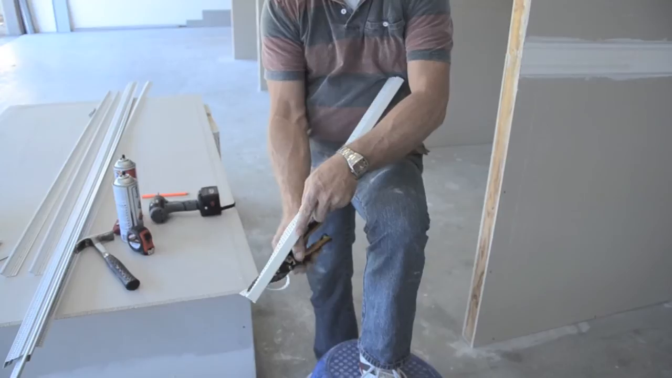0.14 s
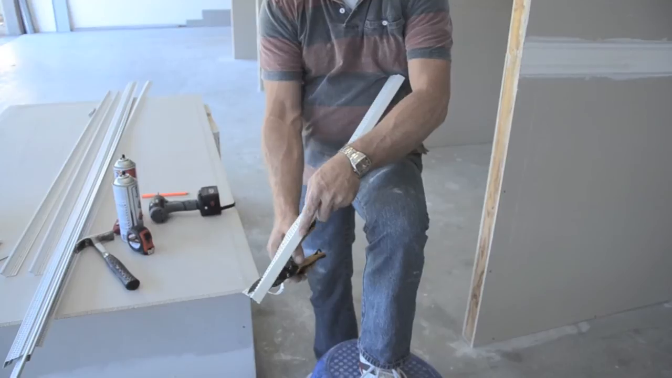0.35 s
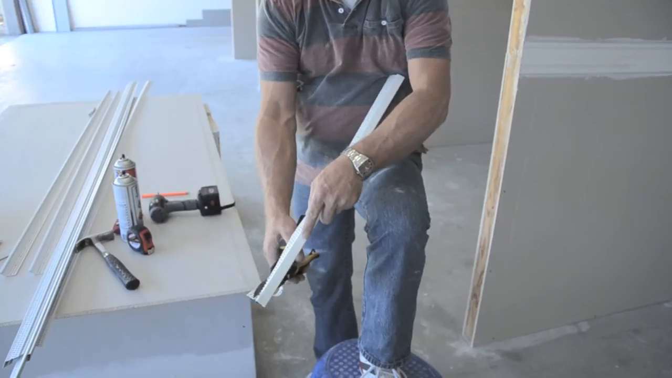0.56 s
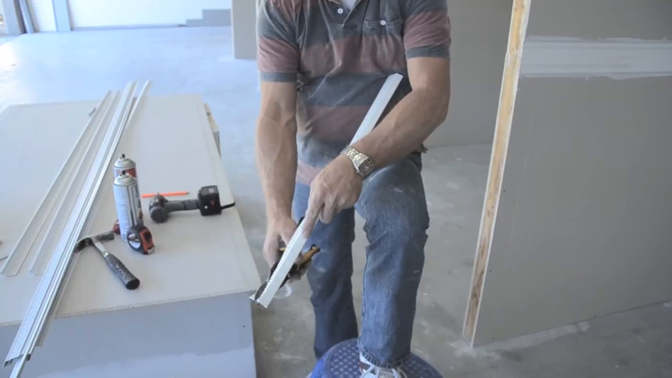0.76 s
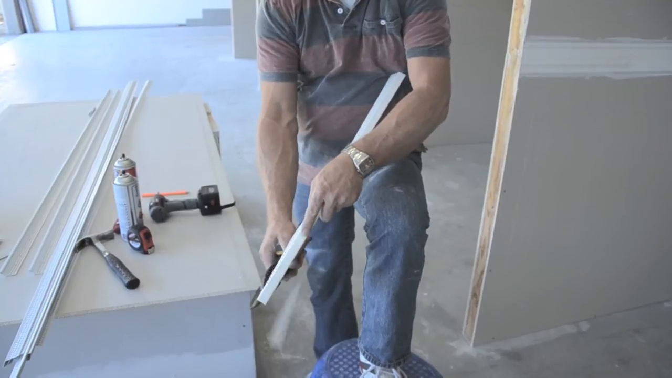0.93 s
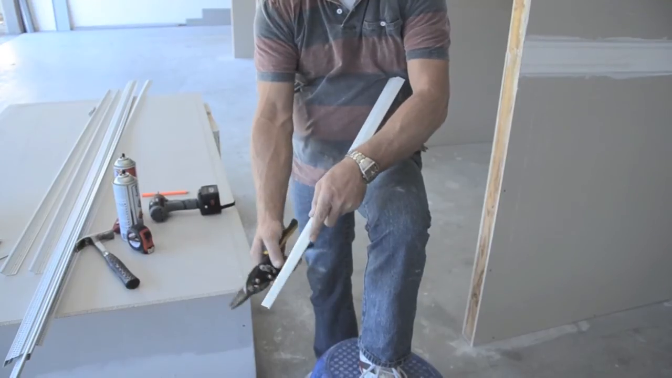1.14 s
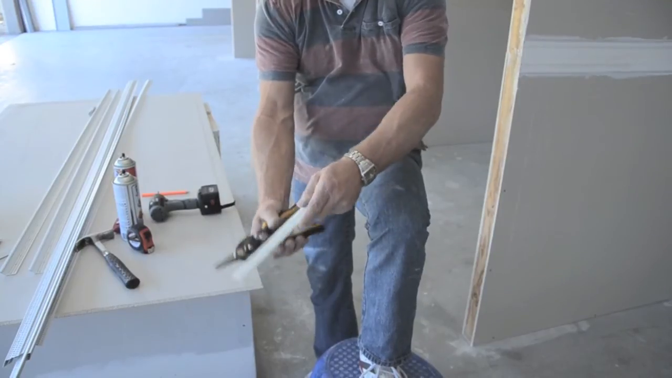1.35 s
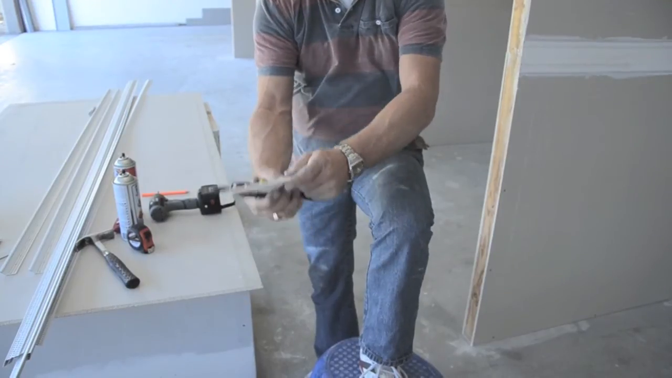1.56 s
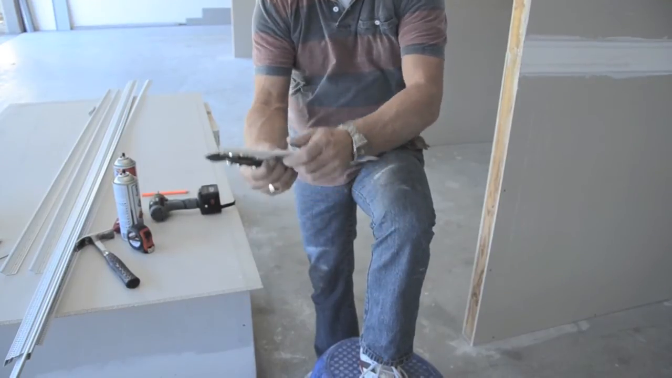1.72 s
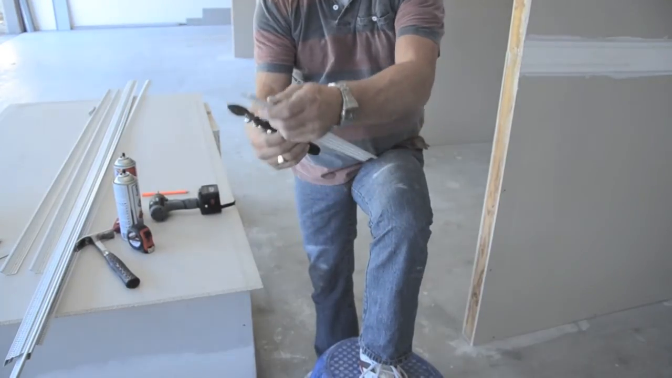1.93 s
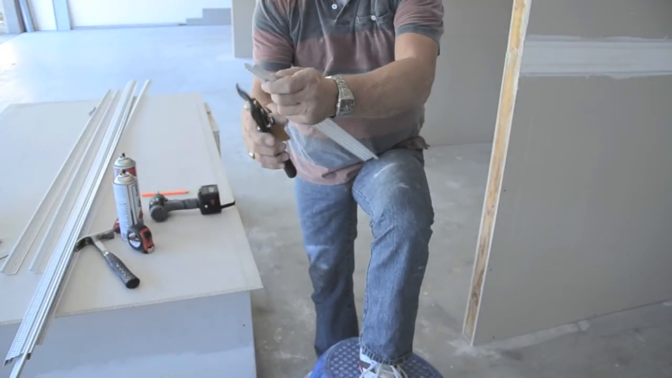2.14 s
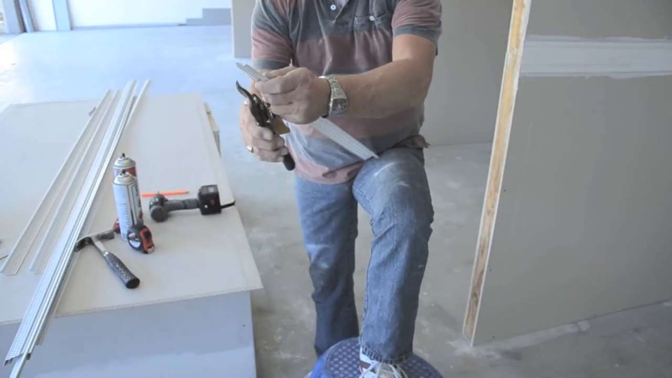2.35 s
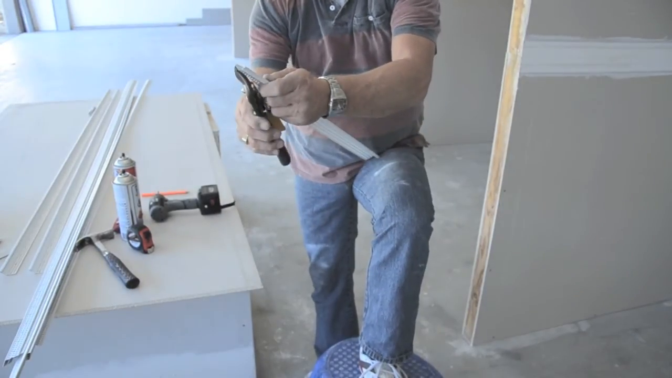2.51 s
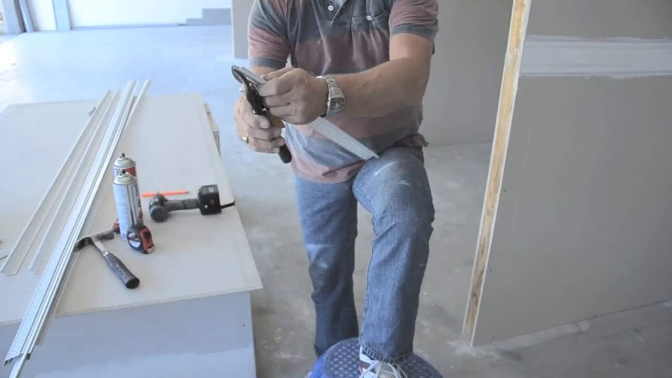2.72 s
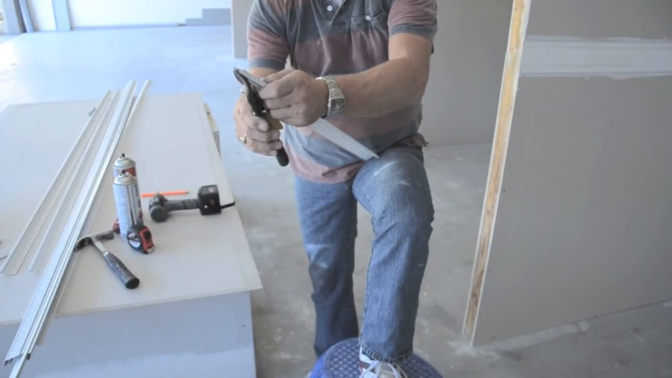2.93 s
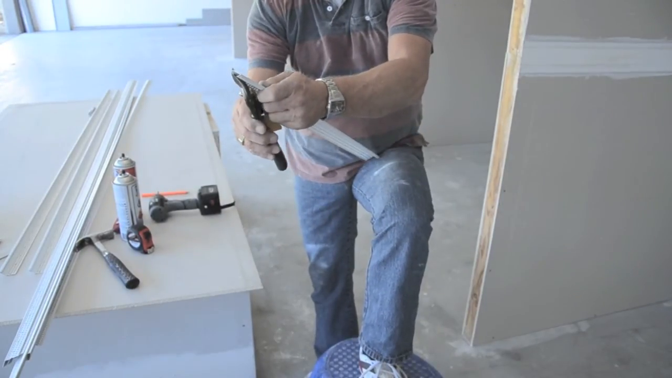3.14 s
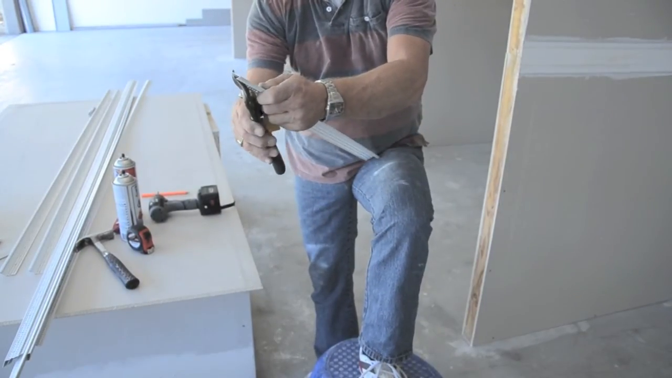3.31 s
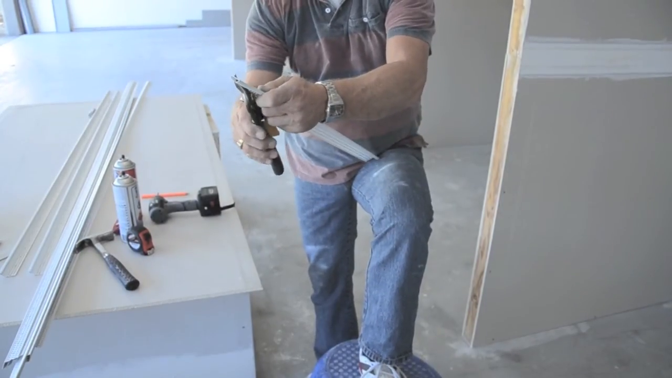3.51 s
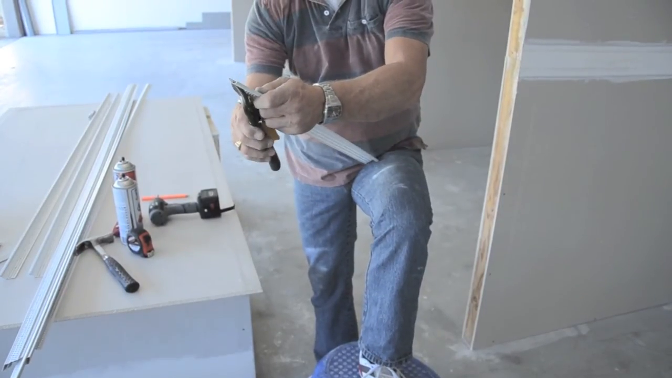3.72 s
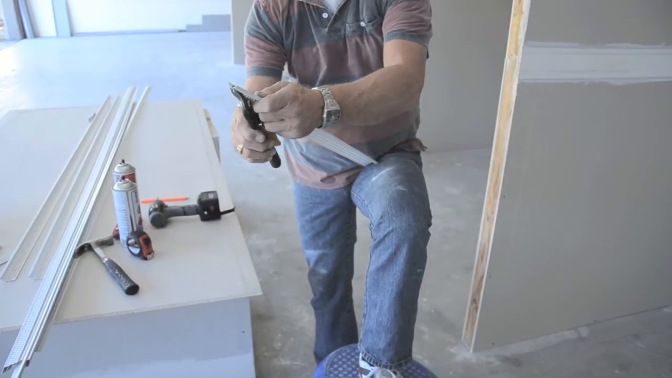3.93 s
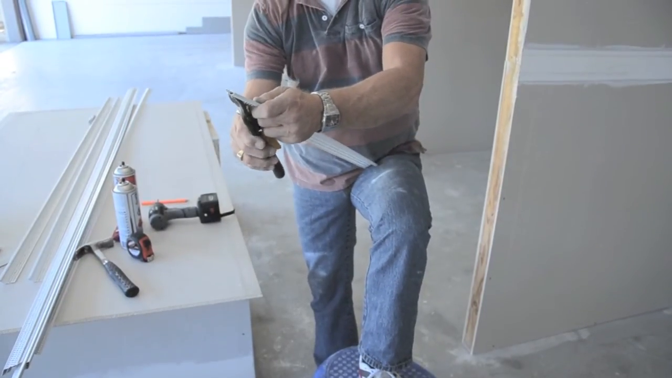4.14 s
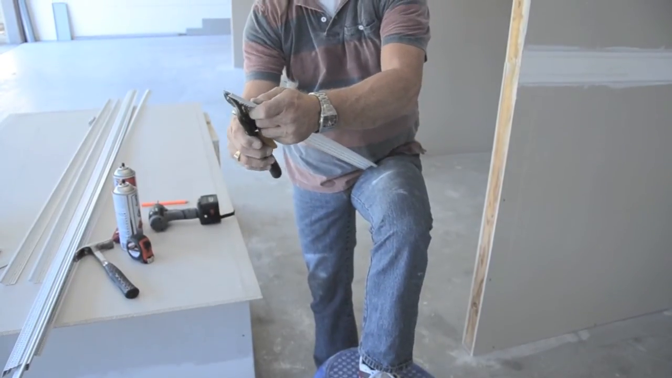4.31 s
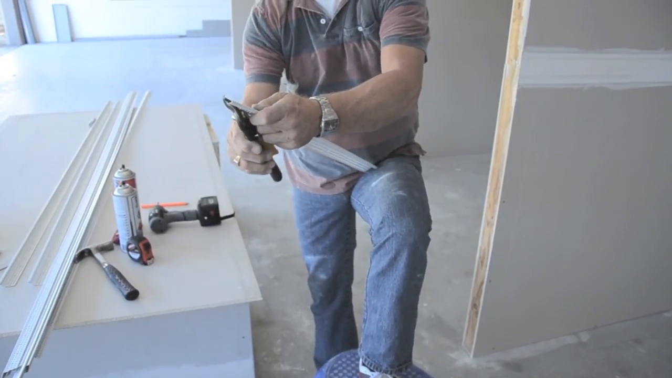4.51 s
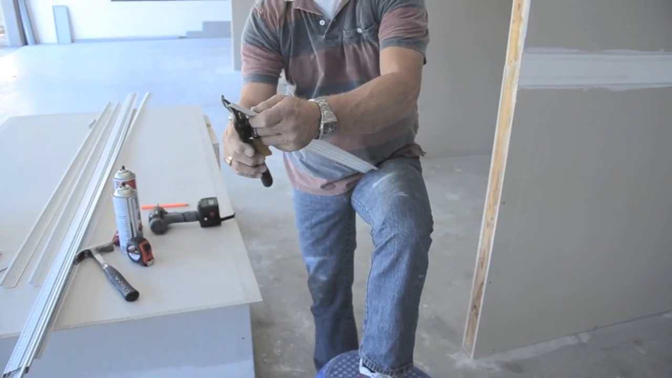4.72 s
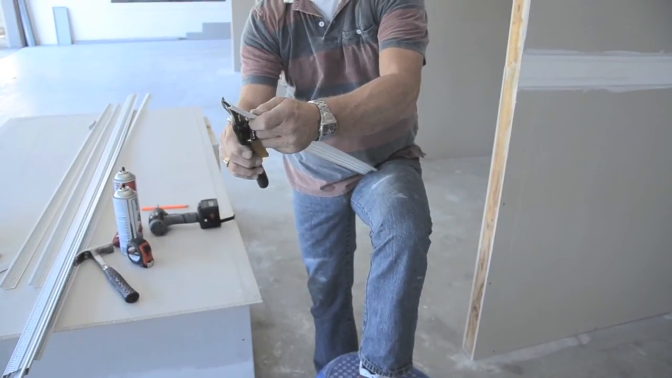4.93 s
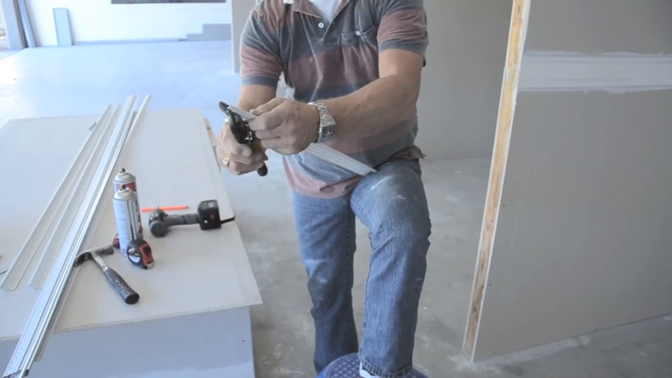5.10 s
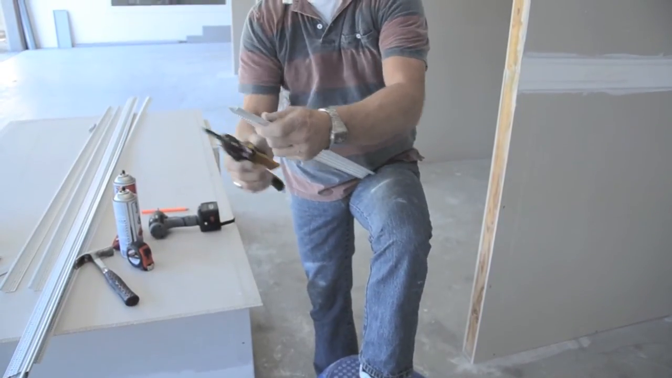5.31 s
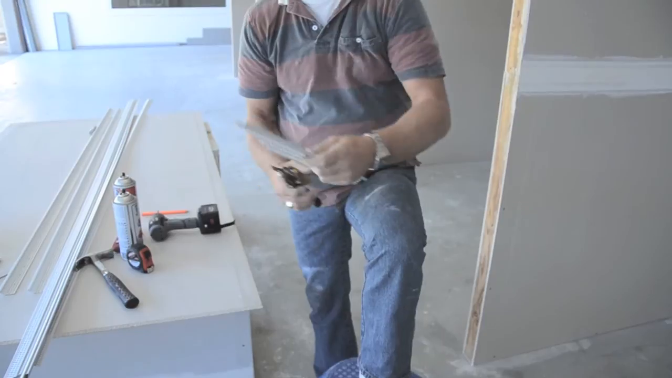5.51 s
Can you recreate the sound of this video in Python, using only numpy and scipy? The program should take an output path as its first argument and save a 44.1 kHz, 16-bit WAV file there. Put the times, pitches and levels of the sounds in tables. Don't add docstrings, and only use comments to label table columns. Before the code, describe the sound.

Over a low distant machine hum and faint thin whine, snip blades clack shut, plastic tears with a short crack, and the cut piece smacks the floor. The strip is lifted and turned with soft rustles and tiny clicks. Near the end come a small bite and a bright hard snip, then cloth brushing; single-channel, medium distance, with an empty room's echo.

```python
import sys
import numpy as np
from scipy import signal
from scipy.fft import rfft, irfft
from scipy.io import wavfile
from scipy.ndimage import uniform_filter1d

SR = 44100
rng = np.random.default_rng(int(sys.argv[2]) if len(sys.argv) > 2 else 0)


def generate_wav(signal):
    frames = np.transpose(np.atleast_2d(signal))
    scaled = np.clip(frames, -1, 1) * 32767
    pcm = np.round(scaled).astype(np.int16)
    wavfile.write(sys.argv[1], SR, pcm)


def convert_level_to_amplitude(level_db):
    exponent = np.asarray(level_db, float) / 20
    return 10 ** exponent


N = 245195
LEAD = SR // 4

# pitch_hz [Hz], density_db [dB per Hz]
HUM_SPECTRUM = [(18, -48), (38, -13.5), (52, 8.5), (100, -9), (189, 0), (540, -2), (1040, -1.5),
                (1800, -8.5), (2540, -15.5), (4530, -20.5), (6300, -26), (8500, -31), (14300, -46),
                (14900, -69)]
# pitch_hz [Hz], width_hz [Hz], level_db [dB rms]
MACHINE_BANDS = [(180.4, 11, -70), (2060, 85, -68), (6550, 276, -75.5), (7640, 300, -84.5),
                 (10300, 250, -87.5), (15600, 150, -96)]
# pitch_hz [Hz], level_db [dB rms]
WHINE_TONES = [(2216, -76.5), (15713, -79.5)]
# pitch_hz [Hz], width_hz [Hz], gain_db [dB]
TREBLE_DIPS = [(5720, 330, -12), (6920, 170, -10), (14900, 650, -16)]

# pitch_hz [Hz], t60_s [s]
ROOM_DECAY = [(200, 0.72), (800, 0.91), (2000, 0.84), (4000, 0.83), (8000, 0.66), (12000, 0.33),
              (16000, 0.24)]
ROOM_START_MS, ROOM_RISE_MS = 1.8, 4.06
# delay_ms [ms], level_db [dB], smear_ms [ms]
LOW_ECHOES = [(4.2, -12, .5), (9, -11, .05), (17.5, -15, 2.5), (24, -15, 1.5), (31.3, -5.5, .03),
              (35.5, -15, 1.5), (40.5, -15, 1.5)]
FLOOR_ECHOES = [(3.54, -3.5, 0.32), (10.3, -16, 0.24), (15.96, -14, .2), (21.42, -9, 3.2),
                (38.15, -14, 2.9), (52, -22, 1.3)]
HIGH_ECHOES = [(5.773, -3, 0.38), (15.34, -16, 0.22), (18.6, -11, 1.7), (24.2, -10.5, .3),
               (33.9, -15.5, 1.5)]
KNEE_ECHOES = [(4.5, -10, .8), (9, -10.5, 0.98), (20, -10.5, 3.6)]

# pitch_hz [Hz], width_hz [Hz], level_db [dB]
DULL_CLOTH = [(4810, 1500, 4.6), (3260, 2000, 4), (6200, 1000, 0.73)]
BRIGHT_CLOTH = [(9600, 1900, 1.5), (7830, 1500, 0), (12400, 3000, -20)]
# start_s [s], rise_s [s], hold_s [s], level_db [dB],
# dullness_db [dB of the dull band over the bright]
STROKES = [(0.45, .06, 0.13, -76, 14), (0.74, .05, 0.03, -76, 11), (1.165, 0.033, 0.02, -72, 15.5),
           (1.52, 0.047, 0.09, -62.5, 6), (1.7, .01, 0.01, -63, 9), (1.798, 0.018, 0.14, -57.5, -2),
           (1.996, .03, 0.032, -65, 10.5), (2.3, .05, 0.05, -74, 2), (2.43, .05, .05, -74, 3),
           (2.555, .01, 0.02, -76, 7), (2.963, 0.024, 0.02, -75, 0), (3.36, .015, 0.033, -76, 6),
           (3.66, .03, 0.04, -87, 17), (3.9, .015, 0.02, -81, 15), (4.18, 0.036, 0.03, -73, 10.5),
           (4.366, .01, 0.015, -73, 8.5), (4.494, 0.032, 0.12, -69.5, 7.5), (4.969, 0.009, 0.028, -66, 16),
           (5.253, 0.065, 0.02, -56.5, 2.5), (5.33, 0.031, 0.015, -45.5, -0.5),
           (5.401, 0.066, 0.1, -43, -2)]
# start_s [s], level_db [dB]
EDGE_TICKS = [(-.07, -42), (0.134, -70), (0.62, -69), (1.3257, -46), (1.3279, -41), (1.477, -54),
              (1.493, -57), (1.714, -60), (1.807, -69), (2.924, -72), (3.364, -73), (3.662, -71),
              (3.707, -69), (3.9, -68), (3.954, -75), (4.373, -69), (4.775, -80), (4.978, -62),
              (5.0026, -78)]
# start_s [s], level_db [dB], pitch_hz [Hz]
JOINT_TICKS = [(1.0323, -48, 3000), (1.0468, -44.5, 2800), (1.067, -51, 2220), (2.669, -57.5, 4000),
               (3.661, -60.5, 5000), (3.706, -57.5, 4000), (3.897, -60.5, 4440), (4.227, -54.5, 4000),
               (4.665, -52, 3500)]
# start_s [s], pitch_hz [Hz], level_db [dB], t60_s [s]
STEEL_RINGS = [
    (2.805, 3410, -51.5, 1.05),
    (5.055, 1650, -34, 0.24),
    (0.922, 1700, -43, 0.4),
    (5.049, 1450, -49, 3.9),
]

# pitch_hz [Hz], width_hz [Hz], direct_db [dB to the microphone], room_db [dB]
SLIDE_BODY = [(3000, 860, -0.5, -11), (5230, 870, 3.5, -3), (7900, 4700, -13, -14.5),
              (12000, 1800, -19, -25)]
TURN_BODY = [(2920, 1300, -5.5, -7), (4000, 240, 5, 5.5), (4780, 800, 1, 2), (6600, 700, -14, -17),
             (8600, 2400, -7, -10.5), (12500, 2600, -28, -28)]
SQUEAK_BODY = [(1680, 120, 1.5, 4.5), (2830, 430, -5, -3.5), (3397, 120, 4, 1), (4470, 550, -12, -14),
               (6500, 2100, -22, -23)]
OFFCUT_BODY = [(265, 150, -30, -16), (459, 140, -5, -1), (760, 440, -2.5, 0), (1310, 440, 1, 5),
               (2000, 1300, -5.5, -1.5), (2800, 1300, -12, -2.5), (3480, 225, -9, -3.5),
               (4800, 1250, -5.5, -3), (6350, 1500, -4, -6), (8200, 3000, -9, -6), (12000, 2600, -35, -42)]
HANDLE_BODY = [(905, 350, -13, -5.5), (1554, 220, 1.5, 1.5), (2050, 200, 6, 0), (3040, 380, -2, -10),
               (4830, 970, -4.5, -11.5), (7170, 1500, -13, -15.5), (11000, 2800, -30, -23)]
SPLIT_BODY = [(330, 250, -24, -22.5), (900, 1400, -8, -13), (1840, 1500, -4.5, -6.5), (3030, 520, 6.5, -2),
              (3880, 610, 2, -5.5), (4750, 1400, -2, -11), (6300, 1100, -20, -10), (9000, 2400, -1.5, -7),
              (12000, 2000, -32, -22)]
NOTCH_BODY = [(2157, 1100, -1, 1.5), (2890, 430, -6, 1.5), (3500, 320, 4, -1), (4200, 950, 2.5, 3),
              (5300, 900, 3.5, -2), (6360, 2500, -5, -7.5), (10500, 1700, -9.5, -36)]
STRIP_BODY = [(810, 120, -16, -7), (1420, 480, -9, 1), (1640, 230, -15, 5.5), (2270, 260, -12, -1.5),
              (3060, 730, -0.5, 2.5), (5000, 900, 4, 1.5), (5800, 1500, -2, -4.5), (8150, 1300, -17, -10.5),
              (9170, 1760, -3, -3), (12400, 1900, -26, -12)]
BLADES_BODY = [(997, 300, -34, -22), (1676, 300, -19, -12.5), (1987, 620, -7, -1), (3170, 600, -8.5, -5.5),
               (4080, 440, 3, -2.5), (4850, 810, -5.5, -4.5), (6200, 1700, -13, -4.5),
               (7700, 2700, -6.5, -11), (9600, 3200, -12, -5.5), (13000, 2870, -9.5, -12.5)]
# [Hz, top of the blow]
SLIDE_BLOWS = [
    (2.031, -53, -49.5, 5, 14000),
    (2.038, -49.5, -56, 1.1, 14000),
    (2.7922, -43, -50.5, 6.3, 25000),
]
TURN_BLOWS = [
    (2.213, -45.5, -45, 0.43, 20000),
    (2.238, -42.5, -46.5, 3.9, 15000),
]
SQUEAK_BLOWS = [
    (2.8005, -37.5, -43.5, 3.16, 9000),
    (2.8067, -44, -40, 2.6, 9000),
]
OFFCUT_BLOWS = [
    (1.222, -21.5, -22.5, 0.48, 25200),
    (1.2222, -20.5, -23.5, 2.1, 12000),
]
HANDLE_BLOWS = [
    (0.9212, -39, -35, 0.3, 20000),
    (0.922, -31, -45, 1.3, 6000),
]
SPLIT_BLOWS = [
    (0.818, -31, -37.5, 5.6, 6000),
    (.8250, -30.5, -36.5, 4.3, 9000),
    (0.8282, -28, -33.5, 1.25, 20000),
    (0.833, -36, -34.5, 3, 12000),
    (0.836, -33, -32.5, 0.64, 20000),
    (0.847, -40, -45, 1.8, 20000),
]
NOTCH_BLOWS = [
    (-.09, -40, -31.5, 1.5, 9000),
    (4.7867, -35, -33.5, 0.17, 25000),
    (4.7876, -34, -38, 1.1, 6060),
]
STRIP_BLOWS = [
    (5.0414, -25, -34, 0.71, 20000),
    (5.0422, -18.5, -24, 0.49, 20000),
    (5.0444, -27.5, -23, 1, 20000),
]
BLADE_BLOWS = [
    (0.1474, -19.3, -27.5, 0.11, 25000),
    (.1482, -18.5, -21.5, 0.89, 5500),
]


def evened(x):
    return x / np.sqrt(np.mean(x ** 2) + 1e-20)


def read(points, hz):
    f, value = np.transpose(points)
    return np.interp(np.log(hz + 1), np.log(f + 1), value)


def causal(gain):
    cepstrum = irfft(np.log(np.maximum(gain, 1e-5)))
    cepstrum[1:2048] *= 2
    cepstrum[2049:] = 0
    return irfft(np.exp(rfft(cepstrum)))[:2048]


def body(modes, steep=1.436, soft_hz=30000):
    hz = np.fft.rfftfreq(4096, 1 / SR)
    power = sum(convert_level_to_amplitude(db) ** 2 / (1 + (2 * (hz - f) / width) ** 2) ** steep for f, width, db in modes)
    softened = np.sqrt(power / (1 + (hz / soft_hz) ** 4))
    lowest_hz = 0.59 * modes[0][0]
    h = causal(softened * hz ** 3 / (hz ** 3 + lowest_hz ** 3))
    return h / np.linalg.norm(h)


def burst(ms):
    age = np.arange(1, 2049) / (ms * SR / 1000 + 1)
    fall = np.exp(-age) * (1 - np.exp(-age / 0.24))
    x = rng.standard_normal(2048)
    for _ in range(6):
        local_power = uniform_filter1d(x ** 2, size=9) + 1e-9 * x.var()
        z = rfft(x / np.sqrt(local_power) * fall)
        x = irfft(z / (abs(z) + 1e-9))
    x = x * np.sqrt(fall)
    return x / np.linalg.norm(x)


def add(mix, start_s, sound):
    part = mix[round(start_s * SR) + LEAD:][:len(sound)]
    part += sound[:len(part)]


def tail():
    hz, t, z = signal.stft(rng.standard_normal(SR), SR, nperseg=256)
    decay = convert_level_to_amplitude(-60 * t / read(ROOM_DECAY, hz)[:, None])
    h = signal.istft(z * decay, SR, nperseg=256)[1]
    ms = np.arange(len(h)) / SR * 1000
    h = h * (1 - np.exp(-np.maximum(ms - ROOM_START_MS, 0) / ROOM_RISE_MS))
    return h / np.linalg.norm(h)


def echoed(x, echoes):
    taps = np.zeros(6000)
    taps[0] = 1
    for delay_ms, level_db, smear_ms in echoes:
        k = round(delay_ms * SR / 1000)
        taps[k:k + 2048] += convert_level_to_amplitude(level_db) * burst(smear_ms)
    return signal.oaconvolve(x, taps)[:len(x)]


def struck(modes, blows, echoes):
    near, far = np.zeros((2, N + LEAD))
    direct_modes = [(f, width, direct_db) for f, width, direct_db, _ in modes]
    room_modes = [(f, width, room_db) for f, width, _, room_db in modes]
    for start_s, direct_db, room_db, burst_ms, soft_hz in blows:
        knock = signal.fftconvolve(burst(burst_ms), body(direct_modes, soft_hz=soft_hz))
        add(near, start_s, convert_level_to_amplitude(direct_db) * knock)
        add(far, start_s, convert_level_to_amplitude(room_db) * tail())
    far = signal.oaconvolve(far, body(room_modes))[:N + LEAD]
    return np.sqrt(SR / 100) * (echoed(near, echoes) + far)


def hum():
    frames, hz, t = N // 256 + 5, np.fft.rfftfreq(1024, 1 / SR), np.arange(N) / SR
    a, b, patches = rng.standard_normal((frames, 513, 3)).T
    patches = uniform_filter1d(patches, 12, 0)
    patches = evened(uniform_filter1d(patches, 20, 1))
    z = (a + 1j * b) * convert_level_to_amplitude(read(HUM_SPECTRUM, hz)[:, None] + 0.8 * patches)
    noise = signal.istft(z, nperseg=1024, noverlap=768)[1][:N]
    out = convert_level_to_amplitude(-52) * evened(noise)
    for f, width, level_db in MACHINE_BANDS:
        r = np.exp(-np.pi * width / SR)
        drift = signal.lfilter([1], [1, -r], rng.standard_normal(N) + 1j * rng.standard_normal(N))
        out += convert_level_to_amplitude(level_db) * evened((drift * np.exp(2j * np.pi * f * t)).real)
    return out


def whine():
    t = np.arange(N) / SR
    return sum(np.sqrt(2) * convert_level_to_amplitude(db) * np.sin(2 * np.pi * f * t) for f, db in WHINE_TONES)


def rustle():
    t = np.arange(0, N + 40, 40) / SR
    uneven = convert_level_to_amplitude(4.1 * np.minimum(rng.exponential(1, N), 5))
    slips = rng.random(N) < 6000 / SR
    grains = evened(rng.standard_normal(N) * uneven * slips)
    grains = evened(grains + 2.6 * signal.oaconvolve(grains, tail())[:N])
    dull_power, bright_power = np.zeros((2, len(t)))
    for start_s, rise_s, hold_s, level_db, dullness_db in STROKES:
        fade_db = 151 * np.maximum(t - start_s - rise_s - hold_s, 0)
        power = np.clip((t - start_s) / rise_s, 0, 1) ** 3 * convert_level_to_amplitude(level_db - fade_db) ** 2
        bright_power += power
        dull_power += power * convert_level_to_amplitude(dullness_db) ** 2
    out = np.zeros(N)
    for power, modes in ((bright_power, BRIGHT_CLOTH), (dull_power, DULL_CLOTH)):
        cloth = signal.oaconvolve(grains, body(modes))[:N]
        out += np.interp(np.arange(N) / SR, t, np.sqrt(power)) * cloth
    return out


def ticks():
    low, high = np.zeros((2, N + LEAD))
    lift_s, low_room_db, high_room_db = 1.6, -4.5, -3
    rows = [(s, db, 10000, 4300, 1.2) for s, db in EDGE_TICKS]
    for s, db, hz in JOINT_TICKS:
        rows.append((s, db, hz, 1170 * (hz / 3000) ** 3.2, 1.1))
    for s, db, hz, width, ms in rows:
        tick = np.convolve(burst(ms)[:1200], body([(hz, width, 0)], steep=2.4)[:400])
        add(low if s < lift_s else high, s, convert_level_to_amplitude(db) * tick)
    near = echoed(low + high, KNEE_ECHOES)
    into_room = convert_level_to_amplitude(low_room_db) * low + convert_level_to_amplitude(high_room_db) * high
    return np.sqrt(SR / 100) * (near + signal.oaconvolve(into_room, tail())[:N + LEAD])


def ringing():
    out, t = np.zeros(N + LEAD), np.arange(SR) / SR
    for start_s, hz, level_db, t60_s in STEEL_RINGS:
        waver = convert_level_to_amplitude(6.0 * evened(uniform_filter1d(rng.standard_normal(SR), size=500)))
        swell = np.minimum(t / 0.018, 1)
        add(out, start_s, convert_level_to_amplitude(level_db - 60 * t / t60_s) * waver * swell * np.sin(2 * np.pi * hz * t))
    return out


def handling():
    slide = struck(SLIDE_BODY, SLIDE_BLOWS, HIGH_ECHOES)
    turn = struck(TURN_BODY, TURN_BLOWS, HIGH_ECHOES)
    return slide + turn + struck(SQUEAK_BODY, SQUEAK_BLOWS, HIGH_ECHOES)


def handle_knock():
    return struck(HANDLE_BODY, HANDLE_BLOWS, KNEE_ECHOES)


def offcut_drop():
    return struck(OFFCUT_BODY, OFFCUT_BLOWS, FLOOR_ECHOES)


def cutting():
    first_bite = struck(BLADES_BODY, BLADE_BLOWS, LOW_ECHOES)
    split = struck(SPLIT_BODY, SPLIT_BLOWS, KNEE_ECHOES)
    notch = struck(NOTCH_BODY, NOTCH_BLOWS, HIGH_ECHOES)
    last_cut = struck(STRIP_BODY, STRIP_BLOWS, HIGH_ECHOES)
    return first_bite + split + notch + last_cut


def scene():
    background = hum() + rustle()
    work = ticks() + ringing() + handling() + handle_knock() + offcut_drop() + cutting()
    return (background + work[LEAD:])[None]


def low_pass(x):
    return signal.sosfilt(signal.butter(12, 16570, fs=SR, output="sos"), x)


def record(dry):
    hz = np.fft.rfftfreq(4096, 1 / SR)
    overload, edge_hz, bass_cut_hz = 1.4, 15950, 42
    colour_db = sum(db / (1 + (2 * (hz - f) / width) ** 2) for f, width, db in TREBLE_DIPS)
    colour_db -= 80 / (1 + (edge_hz / (hz + 1)) ** 150)
    colour_db -= 14 / (1 + (hz / bass_cut_hz) ** 6)
    soft = overload * np.tanh(dry / overload)
    mix = signal.oaconvolve(soft, causal(convert_level_to_amplitude(colour_db))[None])[:, :N] + whine()
    return low_pass(mix)


dry = scene()
out = record(dry)
generate_wav(out)
```